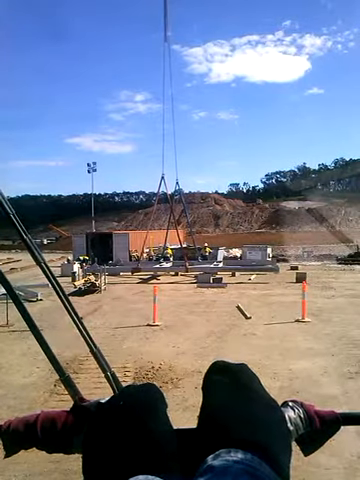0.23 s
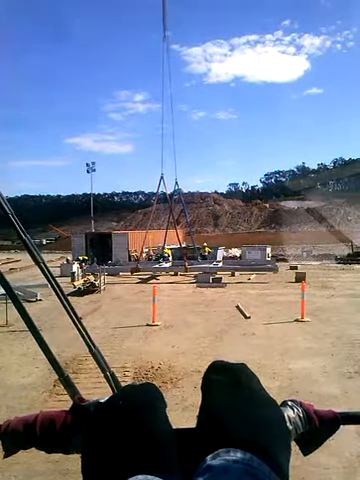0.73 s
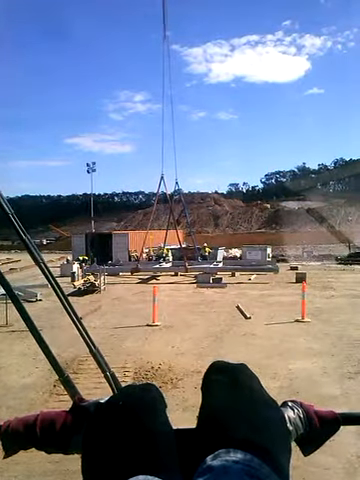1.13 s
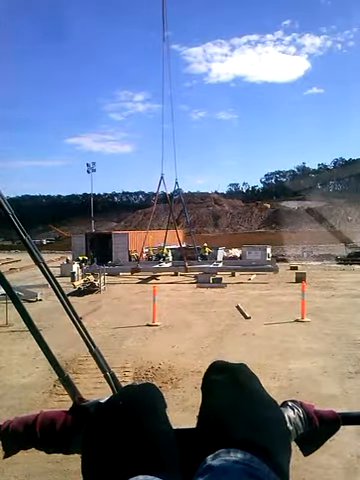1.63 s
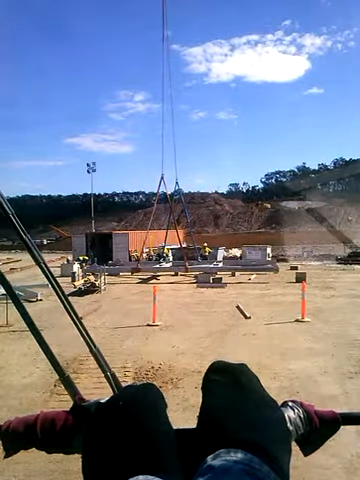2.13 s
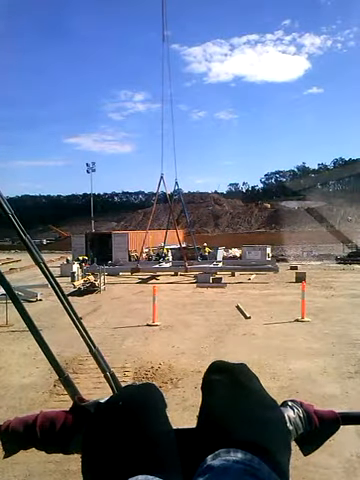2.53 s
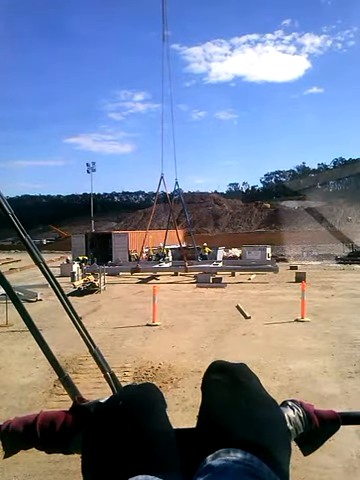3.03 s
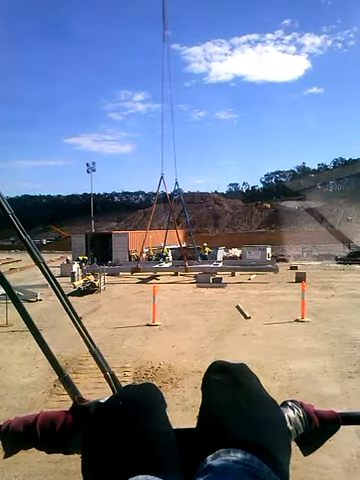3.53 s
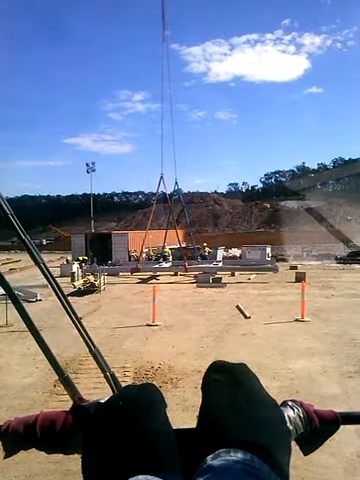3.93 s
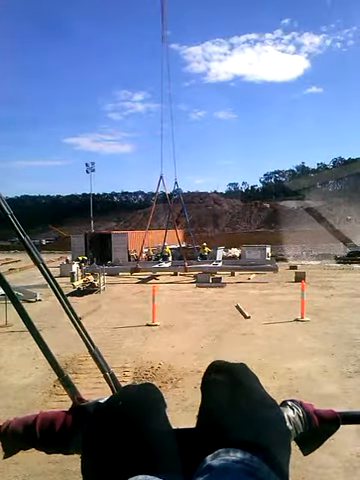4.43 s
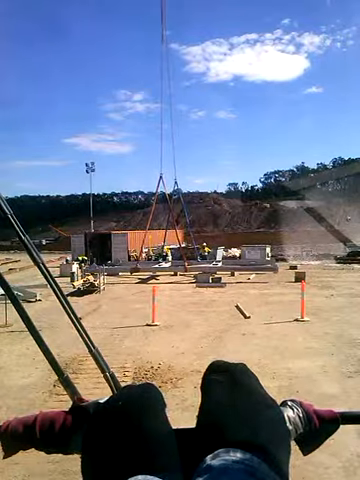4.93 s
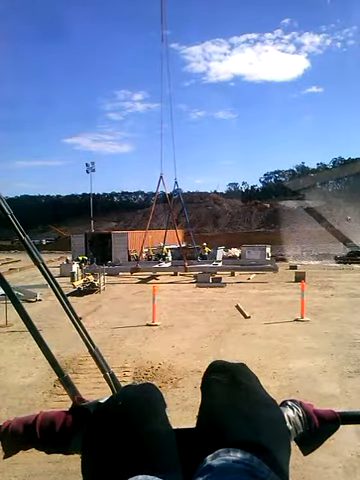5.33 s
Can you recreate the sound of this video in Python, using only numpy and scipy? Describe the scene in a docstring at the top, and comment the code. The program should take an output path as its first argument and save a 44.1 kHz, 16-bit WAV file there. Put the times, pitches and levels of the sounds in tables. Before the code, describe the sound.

A large diesel engine runs throughout, heard from the operator's seat inside a crane cab. Its deep hum throbs about three to four times a second over a dull roar of combustion and fan noise, and a clean, steady hydraulic whine sits above it. The cab's boom eases slightly from about 0.5 to 1.8 seconds, then fills out at 2 seconds, with the pitch barely changing. Close by, a panel takes a few soft knocks in the first 0.1 seconds. A fitting snaps with sharp, rebounding clicks at 0.2 seconds and again, brighter, at 1.5 seconds; a tiny tick follows near 4.9 and a lighter click near 5.6. Out on the construction site, struck steel clinks faintly at about 0.9, 3.6, 4.3, 4.9, 5.3 and 5.5 seconds. The low rumble swells briefly around 3.6 and 4.6 seconds.

```python
"""Six-cylinder diesel of a crawler crane, holding speed under a changing load, heard inside the cab.
Its firing hum and the cab boom throb over a dull roar of combustion and fan noise.
Fan and belt-driven parts hum; a hydraulic pump whines above them.
Close by, a panel takes a few soft knocks and a fitting snaps home with sharp, rebounding clicks.
Struck steel clinks faintly on the work site."""
import sys
import numpy as np
from scipy import signal
from scipy.fft import rfft, irfft
from scipy.io import wavfile
from scipy.ndimage import uniform_filter1d

SR = 44100
rng = np.random.default_rng(int(sys.argv[2]) if len(sys.argv) > 2 else 0)


def master(y):
    """Save y as 16-bit WAV."""
    cut = np.clip(np.atleast_2d(y).T, -1, 1)
    pcm = np.round(cut * 32767)  # scale
    wavfile.write(sys.argv[1], SR, pcm.astype(np.int16))


N = 246519
TIME_S = np.arange(N) / SR
BINS_HZ = np.fft.rfftfreq(N, 1 / SR)


def gain_of(db):
    """Decibels to amplitude."""
    return 10 ** (np.asarray(db) / 20)


def curves(rows):
    """Columns after start time, interpolated over the scene."""
    time_s, *columns = np.transpose(rows)
    return [np.interp(TIME_S, time_s, column) for column in columns]


def spectrum_db(points):
    """Join (freq_hz, level_db) points on a log-frequency axis."""
    freq_hz, level_db = np.transpose(points)
    return np.interp(np.log(BINS_HZ + 1), np.log(freq_hz + 1), level_db)


def lift_db(resonances):
    """Spectral bumps of a set of resonances."""
    return sum(db / (1 + (2 * (BINS_HZ - hz) / width_hz) ** 4) for hz, width_hz, db in resonances)


def noise(shape_db):
    """Unit-rms noise with the given spectral shape."""
    shaped = irfft(rfft(rng.standard_normal(N)) * gain_of(shape_db), N)
    return shaped / np.sqrt(np.mean(shaped ** 2) + 1e-20)


def drift(corner_hz):
    """Unit-rms random wander, rolled off above the corner."""
    return noise(-20 * np.log10(1 + (BINS_HZ / corner_hz) ** 4))


def turns_of(rate_hz):
    """Running phase in turns."""
    return np.cumsum(rate_hz * np.ones(N)) / SR


def tone(turns):
    """Unit-rms sine, random start phase."""
    return np.sqrt(2) * np.sin(2 * np.pi * (turns + rng.random()))


def struck(blows, modes, rise_s, blur_ratio):
    """Blows ring modes; scattered echoes blur each into a narrow band and soften the attack."""
    out = np.zeros(N)
    for pitch_hz, mode_db, t60_s in modes:
        ring = noise(-20 * np.log10(1 + ((BINS_HZ / pitch_hz - 1) / blur_ratio) ** 4))
        for start_s, blow_db in blows:
            age_s = np.clip(TIME_S - start_s, 0, 1)
            envelope = gain_of(-60 * age_s / t60_s) * (1 - np.exp(-age_s / rise_s))
            ring_rms = np.sqrt(np.average(ring ** 2, weights=envelope ** 2))
            out += gain_of(blow_db + mode_db) * envelope * ring / ring_rms
    return out


def steel_clinks():
    """Distant struck steel, ringing in four close modes."""
    # blows on the steel: start_s, level_db
    blows = [(.887, -43), (3.606, -51.5), (3.635, -50.5), (4.273, -41), (4.887, -45), (5.333, -48.5),
             (5.539, -38.5)]
    # steel modes: pitch_hz, gain_db, t60_s
    modes = [(2556, -10.5, 0.26), (2710, -4.5, 0.22), (2760, -6, .16), (2820, -3, 0.12)]
    return struck(blows, modes, rise_s=0.0036, blur_ratio=0.0058)


def panel_knocks():
    """Soft knocks ring a cab panel."""
    # blows on the panel: start_s, level_db
    blows = [(.026, -41.5), (.042, -53.5), (.085, -38.5), (.102, -47)]
    # panel modes: pitch_hz, gain_db, t60_s
    modes = [(420, -0.5, 0.5), (674, -1, 0.45), (1370, -3, 0.12), (2230, 3.5, 0.06), (3400, -6, 0.07),
             (5460, -12, .07), (7300, -11, .07), (9550, -13, 0.11)]
    return struck(blows, modes, rise_s=0.00089, blur_ratio=0.091)


def fitting_clicks(build_db=28, hold_t60s=0.057, crack_gain=0.42, crack_s=0.0016):
    """A fitting slips and snaps home; dense reflections between the panes die in about 0.1 s."""
    # clicks and rebounds: start_s, build_s, t60_s, body_db, ring_db, snap_db
    clicks = [(0.2245, 0.001, 0.082, -29, -37, -40), (0.2285, 0.00055, 0.026, -32.5, -46, -37),
              (0.235, 0.0014, 0.1, -56, -37, -47), (0.2455, 0.0011, 0.063, -38, -48, -53),
              (1.477, 0.0015, 0.067, -42.5, -43, -55), (1.4819, 0.0014, 0.066, -36, -27.5, -40),
              (1.4866, 0.0013, 0.074, -41, -24.5, -44), (4.8516, 0.00026, 0.0037, -62, -36, -55),
              (5.5685, 0.001, .1, -42, -33, -60)]
    # spectra of the body, ring and bright snap: freq_hz, relative_db
    body = [(500, -26), (820, -0.5), (1100, -33), (1350, 5), (1650, -10.5), (2200, 0), (2900, -7.5),
            (4200, -10), (5300, -12.5), (9000, -31), (16000, -53)]
    ring = [(2000, -41), (4000, -19), (5600, -13.5), (6400, -10.5), (7400, -6.5), (8700, -2), (9500, -2.5),
            (11000, -15), (15500, -36)]
    snap = [(3000, -37), (6000, -22), (9000, -8), (11500, 6), (13500, -7), (16000, -11)]
    # fitting resonances: centre_hz, width_hz, lift_db
    resonances = [(850, 120, 8), (1405, 120, 10), (1870, 290, 10.5), (2250, 130, 3), (2915, 340, 7),
                  (3530, 330, 7), (4130, 190, 9), (7300, 340, 4.5), (8440, 250, -1), (8540, 60, 9),
                  (9000, 170, 3), (9100, 100, 3.5), (9550, 200, 0)]
    parts = [noise(spectrum_db(colour) + lift_db(resonances)) for colour in (body, ring, snap)]
    out = np.zeros(N)
    for start_s, build_s, t60_s, *levels_db in clicks:
        age_s = TIME_S - start_s - build_s
        rise_db = build_db * np.minimum(age_s / build_s, 0)
        fall_db = -60 * np.maximum(age_s / t60_s - hold_t60s, 0)  # first reflections hold the level
        crack = 1 + crack_gain * np.exp(-(age_s / crack_s) ** 2)  # direct sound stands above them
        envelope = (TIME_S >= start_s) * crack * gain_of(rise_db + fall_db)
        for part, level_db in zip(parts, levels_db):
            out += gain_of(level_db) * envelope * np.roll(part, rng.integers(N))
    return out


def rumble_swells(swell_s=0.018):
    """Brief low swells in the rumble."""
    # swells: peak_s, pitch_hz, level_db
    swells = [(.115, 229, -41), (.17, 118.5, -39), (.34, 175, -39), (3.6, 197, -36), (4.57, 70, -37),
              (4.58, 212.3, -37), (4.62, 146.6, -33), (4.68, 200, -39), (4.76, 182, -37)]
    return sum(gain_of(db) * np.exp(-((TIME_S - peak_s) / swell_s) ** 2) * tone(hz * TIME_S)
               for peak_s, hz, db in swells)


def roar(level_db=-35, swell_db=0.26, heave_db=2.5, rumble_top_hz=250, hiss_top_hz=10440):
    """Combustion and fan noise, lifted at the cab's resonances; the rumble heaves unevenly."""
    # spectrum through the cab walls: freq_hz, relative_db
    colour = [(6, -21), (24, -6.5), (100, 1), (160, -10), (290, -9), (420, -6.5), (600, -9.5), (900, -11),
              (1350, -17.5), (1900, -21.5), (2600, -29), (4300, -32), (4750, -36), (9600, -36.5)]
    # cab air resonances: centre_hz, width_hz, lift_db
    resonances = [(209, 58, 7.5), (710, 73, 2), (855, 68, 3), (1065, 100, 6), (1396, 34, 3), (1958, 37, 4)]
    rolloff_db = -20 * np.log10(1 + (BINS_HZ / hiss_top_hz) ** 40)
    wash = noise(spectrum_db(colour) + lift_db(resonances) + rolloff_db)
    rumble = irfft(rfft(wash) / (1 + (BINS_HZ / rumble_top_hz) ** 8), N)
    heaving = wash - rumble + rumble * gain_of(heave_db * drift(11))
    return gain_of(level_db + swell_db * drift(15)) * heaving


def accessories(waver_db=2.7, wander_hz=0.23):
    """Fan and belt-driven parts, each humming at a nearly constant pitch."""
    # accessory tones: pitch_hz, level_db
    hums = [(29.6, -47.5), (33.6, -48.5), (46, -63), (86.6, -48.5), (101.1, -50.5), (219.4, -51),
            (362.5, -64), (413.8, -54), (620.4, -46.5), (713.3, -55), (722.7, -58), (751.6, -61),
            (1086.1, -75), (1214.6, -60)]
    return sum(gain_of(db + waver_db * drift(4.8)) * tone(turns_of(hz + wander_hz * drift(2.08)))
               for hz, db in hums)


def hydraulic_pump(flutter_db=0.78, jitter_hz=0.35):
    """One clean whine; pitch and level sag and rise slightly."""
    # pump whine: time_s, pitch_hz, level_db
    whine = [(0.1, 963.5, -40.5), (0.52, 958.5, -40), (1.09, 958.5, -39.5), (2.05, 963, -39),
             (2.82, 966, -40.5), (3.47, 957.5, -41), (3.8, 959, -39.5), (4.65, 961, -39), (5, 960, -41),
             (5.5, 957, -41)]
    pitch_hz, level_db = curves(whine)
    amplitude = gain_of(level_db + flutter_db * drift(13))
    return amplitude * tone(turns_of(pitch_hz + jitter_hz * drift(31)))


def load_gain(load, levels_db):
    """Amplitude at a load, from the levels at no, half and full load."""
    return gain_of(np.interp(load, (0, 0.5, 1), levels_db))


def engine_orders(cycle_turns, load):
    """Harmonics of the four-stroke cycle: some steady, some following the load."""
    # steady tones: cycle_multiple, level_db
    steady = [(3, -52.5), (10, -53), (11, -49.5), (12, -53.5), (17, -52), (45, -57)]
    # load-dependent tones: cycle_multiple, no_load_db, half_load_db, full_load_db
    loaded = [(9, -65, -48.5, -45), (27, -43.5, -43, -56.5), (36, -60, -48, -47)]
    out = sum(gain_of(db) * tone(multiple * cycle_turns) for multiple, db in steady)
    for multiple, *levels_db in loaded:
        out += load_gain(load, levels_db) * tone(multiple * cycle_turns)
    return out


def cab_boom(cycle_turns, load, throb, throb_level_db=-44, shake_level_db=-48):
    """One engine order booms in the cab; it swells with load, throbs and shakes."""
    # boom tone: cycle_multiple, no_load_db, half_load_db, full_load_db
    boom = (18, -35, -31, -30)
    multiple, *levels_db = boom
    wobble = gain_of(throb_level_db) * throb + gain_of(shake_level_db) * drift(9.2)
    return (load_gain(load, levels_db) + wobble) * tone(multiple * cycle_turns)


def firing_hum(firing_hz, throb, waver_db=0.4, throb_db=0.7, slower_gain_db=-10.3):
    """Deep, throbbing hum of the firings, beating with a slightly slower tone."""
    # slowly rising hum strength: time_s, level_db
    strength = [(.3, -33.5), (5.5, -32.5)]
    # beat, faster once the engine is back at work: time_s, rate_hz
    beat = [(2.3, 6.1), (2.64, 7.1)]
    level_db, = curves(strength)
    beat_hz, = curves(beat)
    turns = turns_of(firing_hz) + rng.random()
    hum = np.sin(2 * np.pi * turns)
    slower = gain_of(slower_gain_db) * np.sin(2 * np.pi * (turns - turns_of(beat_hz)))
    return np.sqrt(2) * (hum + slower) * gain_of(level_db + throb_db * throb + waver_db * drift(7.8))


def diesel(no_load_firing_hz=115.9, droop_hz=0.75, sag_hz_s=0.302, throb_hz=3.478, crest_s=0.12):
    """Governed diesel: the firing rate droops under load and sags further while load rises."""
    # load easing off, then returning: time_s, load_fraction
    duty = [(0.1, 0.58), (0.52, 0), (1.78, 0.01), (2.04, 1), (2.5, 0.85), (3.4, .7), (3.65, 0.41),
            (5.59, 0.57)]
    load, = curves(duty)
    load_per_s = uniform_filter1d(np.gradient(load, TIME_S), size=SR // 8)
    firing_hz = no_load_firing_hz - droop_hz * load - sag_hz_s * load_per_s
    cycle_turns = turns_of(firing_hz / 6)  # six firings per cycle
    throb = np.cos(2 * np.pi * throb_hz * (TIME_S - crest_s))
    boom = cab_boom(cycle_turns, load, throb)
    return boom + firing_hum(firing_hz, throb) + engine_orders(cycle_turns, load)


def scene():
    """Mono mix at the operator's seat."""
    machine = diesel() + accessories() + hydraulic_pump() + roar() + rumble_swells()
    return (machine + fitting_clicks() + panel_knocks() + steel_clinks())[None]


def record(dry):
    """Low-pass at 15.7 kHz."""
    taps = signal.firwin(511, 15700, window=("kaiser", 9), fs=SR)
    return signal.oaconvolve(dry, taps[None], "same")


dry = scene()
out = record(dry)
master(out)
```